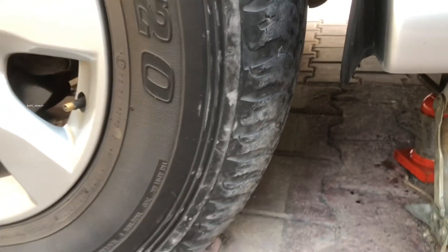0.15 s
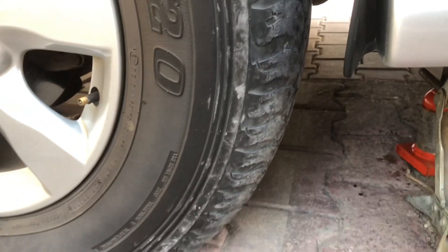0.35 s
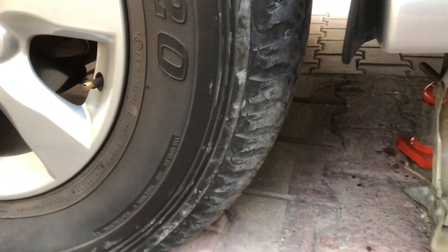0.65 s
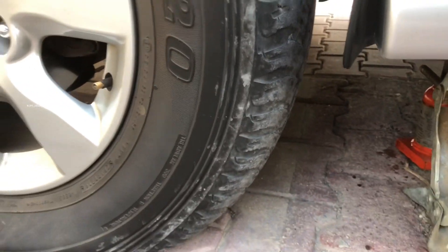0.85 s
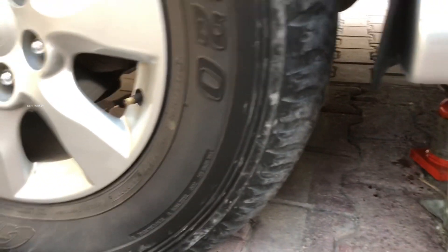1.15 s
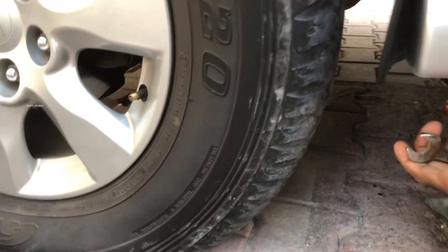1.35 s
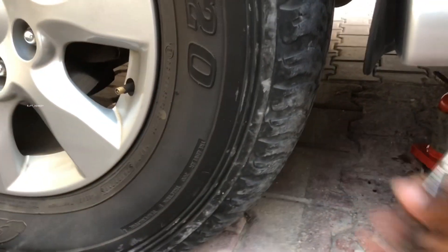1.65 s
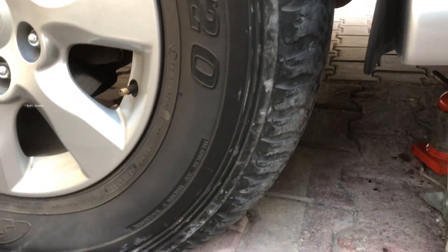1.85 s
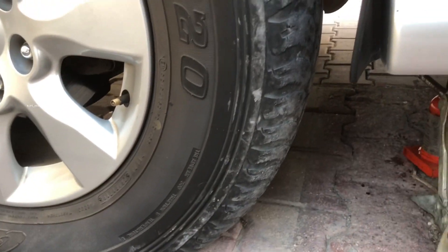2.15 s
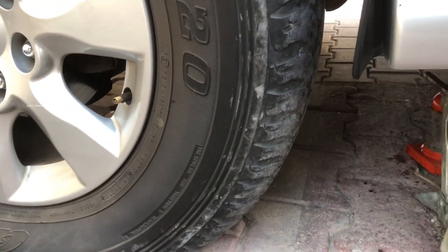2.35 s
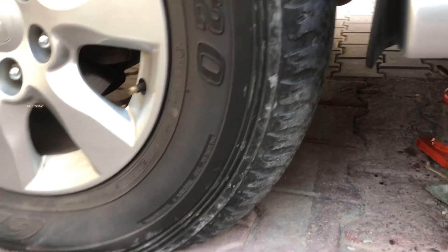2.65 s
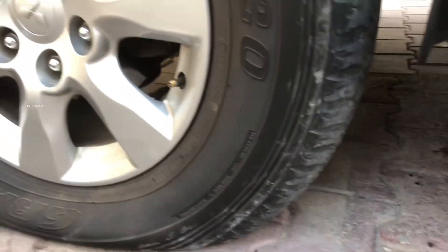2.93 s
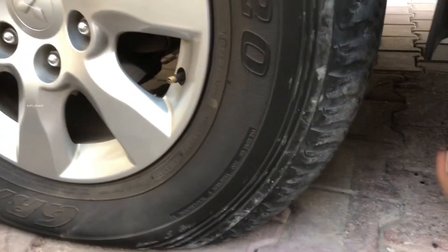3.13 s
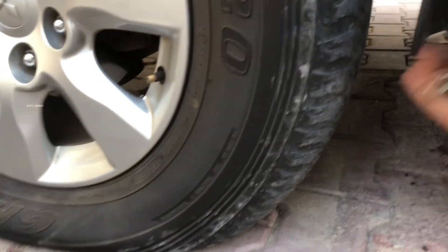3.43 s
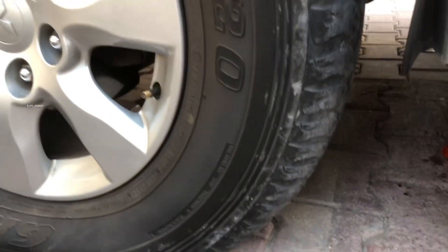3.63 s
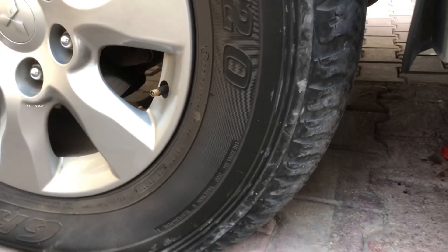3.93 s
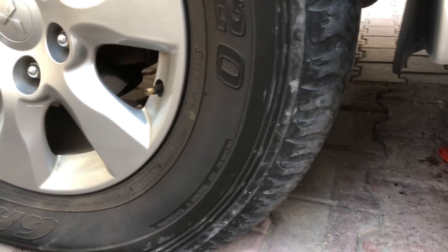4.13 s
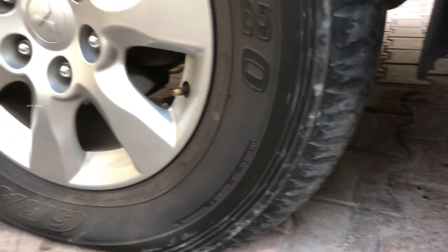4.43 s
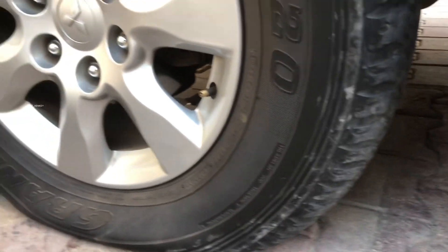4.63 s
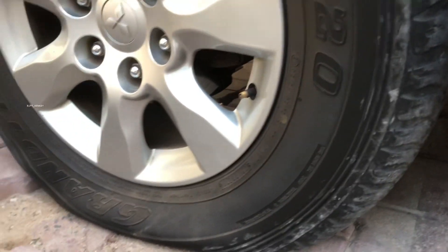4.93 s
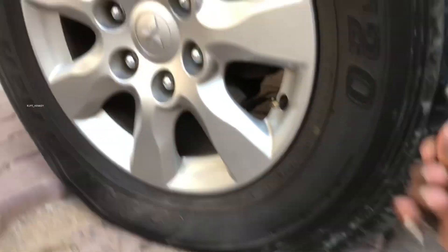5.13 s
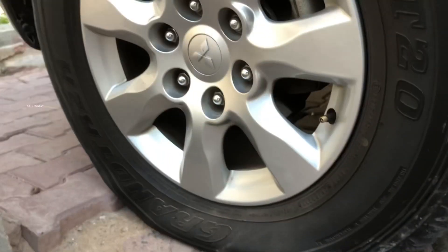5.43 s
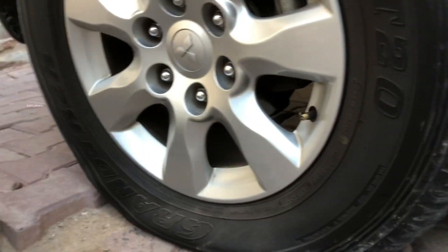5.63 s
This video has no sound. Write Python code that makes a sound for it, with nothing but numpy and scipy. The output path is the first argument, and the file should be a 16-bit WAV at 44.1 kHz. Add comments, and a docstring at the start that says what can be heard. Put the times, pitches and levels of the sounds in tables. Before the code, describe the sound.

A spanner cranks a steel scissor jack beside a car, outdoors and close to the microphone. Sharp clicks come in uneven bursts, each rattling and briefly ringing the steel, with short scrapes of the screw and dull thuds from the loaded frame. A hand slides faintly in the pauses. The clicks grow busiest near the end, then one last knock lands. Distant traffic rumbles and hums throughout, over a faint hiss.

```python
"""A spanner cranks a steel scissor jack beside a car, outdoors on paving, near a phone.
It opens with a burst of knocks, each a short rattle that rings the steel, while the screw scrapes
and the loaded frame thuds. Around 1 s a hand slides softly. More bursts follow, busiest from 4 to 5 s,
then the hand slides again and one last knock lands at 5.7 s. From start to end, distant traffic
rumbles with a wavering hum, over the hiss of the microphone."""
import sys
import numpy as np
from scipy import signal
from scipy.fft import rfft, irfft
from scipy.io import wavfile
from scipy.ndimage import uniform_filter1d

SR = 44100
rng = np.random.default_rng(int(sys.argv[2]) if len(sys.argv) > 2 else 0)


def unload_wav(signal):
    """Save mono or channel-first audio to the path in sys.argv[1] as 16-bit WAV at rate SR, clipped to [-1, 1]."""
    wavfile.write(
        sys.argv[1],
        SR,
        np.round(np.clip(np.atleast_2d(signal).T, -1, 1) * 32767).astype(np.int16),
    )


N = 255074
TIME_S = np.arange(N) / SR
HIT_SAMPLES, ONSET_SAMPLES = int(.25 * SR), int(.01 * SR)  # a hit's level is set over its onset
BAND_EDGES_HZ, BAND_CENTRES_HZ = (1300, 2500, 5500, 9000, 16500), (1800, 3700, 7000, 12200)

# Blows on the steel. Level is for the 3700 Hz band; tilt favours the highs, bend weakens both ends.
# Two pitch regions ring most, and lift raises the band that holds the upper one.
# start_s, level_db, tilt_db_per_octave, bend_db_per_octave_squared, lower_hz, upper_hz, lift_db, rattle_ms
KNOCK_HITS = [(0.1466, -30.5, 0.5, 0, 2370, 4700, 5, 6.5), (0.1994, -43.5, -6, -1.5, 2360, 5200, 4.5, 3.1),
              (0.2987, -23.5, 0.5, 2, 1575, 4760, 1.5, 2.6), (0.344, -63, -11, -5, 1730, 5100, 1, 3.4),
              (0.3662, -53, -14.5, 2.5, 1710, 4270, 3, 3.4), (0.401, -60.5, -13.5, -3, 1820, 3900, 6, 2.7),
              (0.44, -27.5, -9, 3.0, 1826, 2950, 3.5, 1.23), (0.597, -63.5, -14, -3, 1860, 2600, 1, 11),
              (0.736, -39.5, -4.5, 4.5, 1620, 7600, 3.5, 3.1), (0.85, -64, 4, 4.5, 2950, 7260, 4, 3.4),
              (0.9471, -33, -1, 1.5, 2500, 7160, 2, 0.95), (1.4645, -29.5, 1, 3.0, 2860, 7220, 7, 7.6),
              (1.484, -40, -0.5, -1, 2600, 7140, 3, 1.1), (1.6614, -64.5, 2, 0.5, 1460, 5150, 4, 3.4),
              (2.0344, -29.0, -6.0, 1.5, 1885, 3140, 5, 3.2), (2.2679, -28, -4.0, 1.5, 1730, 4820, 2, 2.1),
              (2.325, -52, -12, -1.0, 1490, 3800, 5, 6.3), (2.375, -34.5, -9, 1, 1785, 3360, 2.5, 2.6),
              (2.598, -43, -5, 2, 2820, 4560, 5, 1.9), (2.674, -59.5, -1, 3, 3300, 7500, 2, 0.92),
              (2.918, -62.5, -1.5, -0.5, 2500, 7300, 1, 1.0), (3.1615, -51, -3.5, -2, 1250, 5870, 2.5, 5),
              (3.237, -68, 0, -1, 2500, 5500, 1, 1), (3.4, -38.5, 0.5, 3.0, 2640, 7000, 5.5, 3.5),
              (3.4057, -30, -1, 1.5, 2770, 7300, 9, 3.8), (3.416, -33.5, -3.5, 1, 2300, 7290, 5, 3),
              (3.595, -63, -4, 0, 2500, 7200, 3, 2), (3.9451, -27.0, -1, 0.5, 1600, 4180, 3, 2),
              (4.1256, -50.5, -7.5, -0.5, 1750, 2140, 1.5, 4.9),
              (4.147, -24, -2.5, 1.5, 1630, 6720, 3, 1.6), (4.23, -51, -9, 0.5, 1630, 3800, 2.5, 13),
              (4.337, -72.5, -11, -8, 2190, 4410, 3, 3.4), (4.4199, -56, -7, -3, 1700, 4260, 5, 2.8),
              (4.453, -69.5, -16.5, -7.5, 1500, 4740, 3, 3.4), (4.4791, -49, -11.5, -2, 1720, 3800, 4, 5.6),
              (4.508, -62, -14, -6, 1400, 6770, 3, 4.0), (4.6554, -58.0, -7, 2.5, 2230, 3700, 3, 2.8),
              (4.7092, -52.5, 7.5, 3.0, 6650, 9520, 2, 2.7), (4.7363, -58, 4, 0.5, 6500, 9500, 0, 3.1),
              (4.7513, -51.5, 8.5, 5.5, 3130, 6500, 1.5, 3.4),
              (4.9736, -40.5, -2, 0.0, 1670, 3820, 6, 11.5), (4.9826, -32, 3.0, 9, 4000, 5270, 11, 0.15),
              (4.9868, -30.5, 5.5, 6.5, 3910, 3970, 9.5, 0.81),
              (5.0979, -52.5, -4.0, 0.5, 1250, 4040, 4.5, 0.8), (5.228, -57.5, 2, 6.5, 2500, 6500, 1, 0.7),
              (5.7377, -28, -6.5, 4, 1870, 3530, 2.5, 2)]
def knocks():
    """Each blow of the spanner rings the steel, with a softer thud underneath."""
    out = np.zeros(N + HIT_SAMPLES)
    octaves = np.log2(np.array(BAND_CENTRES_HZ) / BAND_CENTRES_HZ[1])
    for start_s, level_db, tilt_db, bend_db, lower_hz, upper_hz, lift_db, rattle_ms in KNOCK_HITS:
        rattle_noise, blur_noise = rng.standard_normal((2, HIT_SAMPLES))
        bands_db = level_db + tilt_db * octaves - bend_db * octaves ** 2
        bands_db[band_of(upper_hz)] += lift_db
        ring = knock(bands_db, (lower_hz, upper_hz), rattle_ms, rattle_noise, blur_noise)
        add_hit(out, start_s, ring + thud(bands_db[0] - 10, pitch_hz=701, noise=rattle_noise))
    return out[:N]


def knock(bands_db, strong_hz, rattle_ms, rattle_noise, blur_noise):
    """A rattle of contacts sets off clear tones, a blur of tiny ones and an echo under the car."""
    t = np.arange(HIT_SAMPLES) / SR
    contacts = rattle_noise ** 4 * np.exp(-2000 * t / max(rattle_ms, .2))
    full_fade_s = .095
    fade_s = max(.015, full_fade_s * np.tanh((rattle_ms / 1.1) ** 2))  # a very short rattle barely rings
    tones, tone_band = steel_tones(contacts, strong_hz, fade_s)
    bins_hz = np.fft.rfftfreq(HIT_SAMPLES, 1 / SR) + 1
    crowded = irfft(rfft(blur_noise) * gain(strike_boost_db(bins_hz, strong_hz, .06)), HIT_SAMPLES)
    out = 0
    for k, level_db in enumerate(bands_db):
        low_hz, high_hz = BAND_EDGES_HZ[k:k + 2]
        shorten = (2000 / low_hz) ** .76  # high bands die sooner
        blur = crowded * ring_down(contacts, .54 * fade_s * shorten)
        echo = gain(-13) * fade_s / full_fade_s * shorten * blur_noise * ring_down(contacts, .19 * shorten)
        clear = unit(tones[tone_band == k].sum(axis=0))
        wash = gain(-1 + 2 * k) * unit(band(blur + echo, low_hz, high_hz))  # more blur higher up
        out = out + at_level(clear + wash, level_db)
    return out


# The steel's own tones, before each knock or scrape reshapes their strength and length.
# pitch_hz, level_db, fade_s (time to fall by 60 dB)
STEEL_TONES = [(1362, 1, .17), (1543, 0, .12), (1690, -2, .11), (1745, -1, .09), (1835, 0, .08),
               (2115, -1, .12), (2180, -5, .1), (2372, -2, .08), (2582, -2, .08), (2900, -3, .09),
               (3072, -3, .09), (3283, -1, .11), (3530, -6, .09), (3770, -2, .08), (4040, -1, .075),
               (4460, -6, .07), (4920, 0, .08), (5275, -3, .065), (6083, -9, .05), (6460, -6, .055),
               (7110, -1, .05), (7285, 0, .055), (8005, -9, .045), (8400, -5, .045), (9545, -4, .045),
               (10880, -2, .065), (11210, -4, .05), (11960, -4, .045), (13240, -3, .065), (15200, -6, .04)]
def steel_tones(contacts, strong_hz, fade_s):
    """Jack and spanner ring; each tone beats against a close twin. Gives the tones and their bands."""
    t = np.arange(HIT_SAMPLES) / SR
    pitch_hz, level_db, own_fade_s = np.transpose(STEEL_TONES)
    scatter, twin_offset, phase = rng.standard_normal((3, len(pitch_hz)))
    strength = gain(level_db + 3.5 * scatter + strike_boost_db(pitch_hz, strong_hz, .04))
    pitch_hz = pitch_hz * (1 + .004 * scatter[::-1])  # the load detunes the steel a little
    twin_hz = pitch_hz * (1 + .0122 * twin_offset)
    tones = np.sin(2 * np.pi * np.outer(pitch_hz, t) + 9 * phase[:, None])
    twins = .7 * np.sin(2 * np.pi * np.outer(twin_hz, t))
    fades = [ring_down(contacts, max(.004, own_s * fade_s / .1)) for own_s in own_fade_s]
    return strength[:, None] * (tones + twins) * fades, band_of(pitch_hz)


def ring_down(contacts, fade_s):
    """Every contact adds energy to a ring, which then falls by 60 dB in fade_s."""
    return np.sqrt(signal.lfilter([1], [1, -1000. ** (-2 / (fade_s * SR))], contacts))


def strike_boost_db(pitch_hz, strong_hz, width):
    """Where the steel is struck decides which pitches answer most."""
    return sum(13 * np.exp(-(np.log(pitch_hz / peak_hz) / width) ** 2) for peak_hz in strong_hz)


# Thuds of the frame: start_s, level_db, pitch_hz
FRAME_THUDS = [(.44, -34.5, 656), (.756, -36, 184), (0.9469, -31.5, 610), (1.484, -39, 268),
               (2.0344, -36.5, 633), (2.624, -34, 250), (3.1614, -46, 188), (4.6547, -39, 238),
               (4.9734, -30, 283), (4.9819, -39.5, 270), (5.0981, -38, 925), (5.118, -47, 170)]
def frame_thuds():
    """The frame thuds as it settles under the load."""
    out = np.zeros(N + HIT_SAMPLES)
    for start_s, level_db, pitch_hz in FRAME_THUDS:
        add_hit(out, start_s, thud(level_db, pitch_hz, rng.standard_normal(HIT_SAMPLES)))
    return out[:N]


def thud(level_db, pitch_hz, noise, frame_hz=259.2, fade_s=.17):
    """The heavy frame answers late and dull: a brief tone, its own low note and some noise."""
    t = np.arange(HIT_SAMPLES) / SR
    swell = (1 - np.exp(-t / .002)) * 1000. ** (-t / fade_s)
    brief_tone = 1.4 * np.sin(2 * np.pi * pitch_hz * t) * np.exp(-t * pitch_hz / 9)
    frame_note = 1.02 * np.sin(2 * np.pi * frame_hz * t)
    dull_noise = .7 * unit(band(noise, 240, 913))
    return at_level(swell * (brief_tone + frame_note + dull_noise), level_db)


# Turns of the screw in its nut: start_s, end_s, low_tones_db, high_tones_db
SCREW_TURNS = [(0.31, 0.413, -52, -47.5), (0.46, 0.74, -77, -77), (2.06, 2.2, -75, -80),
               (2.271, 2.385, -37, -50), (2.393, 2.493, -52, -57.5), (2.62, 2.7, -66, -64),
               (3.171, 3.237, -67, -51.5), (3.42, 3.497, -57, -56), (3.967, 4.053, -40, -50),
               (4.103, 4.158, -52, -73), (4.224, 4.304, -37, -52.5), (4.323, 4.444, -68, -62),
               (4.47, 4.524, -59, -49), (4.992, 5.103, -60, -53.5)]
def screw_scrape(slips_per_s=900, split_hz=2500):
    """Tiny uneven slips of the thread ring the same steel, damped by the load."""
    slips = rng.standard_normal(N) * (rng.random(N) < slips_per_s / SR) * gain(3 * wander(40))
    t = np.arange(int(.1 * SR)) / SR
    pitch_hz, level_db, fade_s = np.transpose(STEEL_TONES)
    strength = gain(level_db - 8 * np.log2(pitch_hz / 2000))
    fades = 1000. ** -np.outer(1 / (.45 * fade_s), t)
    tones = strength[:, None] * np.sin(2 * np.pi * np.outer(pitch_hz, t)) * fades
    low = unit(signal.fftconvolve(slips, tones[pitch_hz < split_hz].sum(axis=0))[:N])
    high = unit(signal.fftconvolve(slips, tones[pitch_hz >= split_hz].sum(axis=0))[:N])
    turns = np.array(SCREW_TURNS)
    return fade_in_out(turns[:, [0, 1, 2]]) * low + fade_in_out(turns[:, [0, 1, 3]]) * high


# Slides of a hand or sleeve: start_s, end_s, level_db
HAND_SLIDES = [(.76, .9, -69), (1.05, 1.42, -65), (3.56, 3.7, -69), (5.12, 5.42, -66)]
def hand_rustle():
    """A sliding hand makes soft, grainy, bright noise."""
    return fade_in_out(HAND_SLIDES) * gain(2 * wander(28)) * unit(band(rng.standard_normal(N), 2200, 9800))


# How the traffic rises and falls: time_s, rumble_db, roar_db (the roar plays 1 dB above this)
TRAFFIC_LEVELS = [(0.0, -37.5, -45), (0.5, -34, -42), (0.9, -35, -44), (1.03, -35.5, -45),
                  (1.41, -39.5, -48), (1.83, -37.5, -47), (2.24, -37.5, -46.5), (2.85, -38, -47),
                  (3.32, -37, -48.5), (3.59, -39.5, -47.5), (4.3, -37, -46.5), (4.75, -40, -48.5),
                  (5.07, -35, -48), (5.33, -41, -47.5), (5.78, -37.5, -47.5)]
# Tones of the hum: pitch_hz, level_db
HUM_TONES = [(98, -44), (196, -47), (296, -52)]
# Tone colour of the deep rumble: pitch_hz, relative_db
RUMBLE_COLOUR = [(26, -48), (45, -5), (102, -2.5), (166, -8), (195, -8), (264, -16), (286, -11.5),
                 (380, -22.5), (490, -46), (840, -120)]
# Tone colour of the tyre roar: pitch_hz, relative_db
ROAR_COLOUR = [(190, -21), (330, -3), (415, -3), (605, -4.5), (692, -6.5), (777, -6), (4000, -34),
               (5200, -54), (8800, -120)]
def traffic():
    """Far-off rumble and tyre roar swell separately while a hum wavers in pitch."""
    time_s, rumble_db, roar_db = np.transpose(TRAFFIC_LEVELS)
    wavering_s = np.cumsum(1 + .01205 * wander(3)) / SR
    hum = sum(gain(level_db + 2.1 * wander(4.97)) * np.sin(2 * np.pi * pitch_hz * wavering_s)
              for pitch_hz, level_db in HUM_TONES)
    rumble = gain(np.interp(TIME_S, time_s, rumble_db)) * shaped_noise(RUMBLE_COLOUR, flicker_db=1.27)
    roar = gain(np.interp(TIME_S, time_s, roar_db) + 1) * shaped_noise(ROAR_COLOUR, flicker_db=2.02)
    return rumble + roar + hum


# Tone colour of the hiss: pitch_hz, relative_db
HISS_COLOUR = [(1500, -13), (3000, -3), (5500, -5), (7000, -4), (8000, -2.5), (9500, -9),
               (12500, -7.5), (15500, -7.5)]
def microphone_hiss():
    """The microphone adds a faint hiss that flickers slightly."""
    return gain(-64) * shaped_noise(HISS_COLOUR, flicker_db=1.5)


def shaped_noise(colour, flicker_db):
    """Noise with a given tone colour, in octave-wide bands that each flicker on their own."""
    pitch_hz, level_db = np.transpose(colour)
    bins_hz = np.fft.rfftfreq(N, 1 / SR) + 1
    spectrum = rfft(rng.standard_normal(N)) * gain(np.interp(np.log(bins_hz), np.log(pitch_hz), level_db))
    out = 0
    for centre_hz in 22 * 2 ** np.arange(0, 10, .5):
        window = np.cos(np.pi * np.clip(np.log2(bins_hz / centre_hz), -.5, .5)) ** 2
        out = out + irfft(spectrum * window, N) * gain(flicker_db * wander(6.5))
    return unit(out)


def wander(changes_per_s):
    """A smooth random curve that strays about 1 either side of zero."""
    hold = int(SR / changes_per_s)
    steps = np.repeat(rng.standard_normal(N // hold + 1), hold)
    return 1.3 * uniform_filter1d(uniform_filter1d(steps, hold), hold)[:N]


def fade_in_out(rows):
    """A volume curve that opens and closes for each row of start_s, end_s, level_db."""
    return sum(gain(db) * np.interp(TIME_S, [start - .01, start + .01, end - .03, end + .02], [0, 1, .7, 0])
               for start, end, db in rows)


def add_hit(track, start_s, hit):
    """Mix a hit into the track, beginning 1 ms early."""
    at = int((start_s - .001) * SR)
    track[at:at + HIT_SAMPLES] += hit


def at_level(hit, level_db):
    """Scale a hit so that its onset has this level."""
    return gain(level_db) * hit / np.sqrt(np.mean(hit[:ONSET_SAMPLES] ** 2))


def band_of(pitch_hz):
    """Which of the four knock bands holds this pitch, counting from 0."""
    return np.searchsorted(BAND_EDGES_HZ[1:-1], pitch_hz)


def band(x, low_hz, high_hz):
    """Keep the sound between two pitches."""
    return signal.sosfilt(signal.butter(3, [low_hz, high_hz], "bandpass", fs=SR, output="sos"), x)


def gain(db):
    """Turn decibels into a multiplier."""
    return 10 ** (np.asarray(db) / 20)


def unit(x):
    """Scale to an average strength (rms) of 1."""
    return x / np.sqrt(np.mean(x ** 2) + 1e-30)


def scene():
    """The jack close by and traffic far off, in one channel."""
    return (knocks() + frame_thuds() + screw_scrape() + hand_rustle() + traffic() + microphone_hiss())[None]


def record(dry):
    """The phone cuts the bass below 22 Hz and the treble above 15700 Hz."""
    dry = signal.sosfilt(signal.butter(4, 22, "highpass", fs=SR, output="sos"), dry)
    return signal.sosfilt(signal.ellip(10, .2, 60, 15700, fs=SR, output="sos"), dry)


dry = scene()
out = record(dry)
unload_wav(out)
```